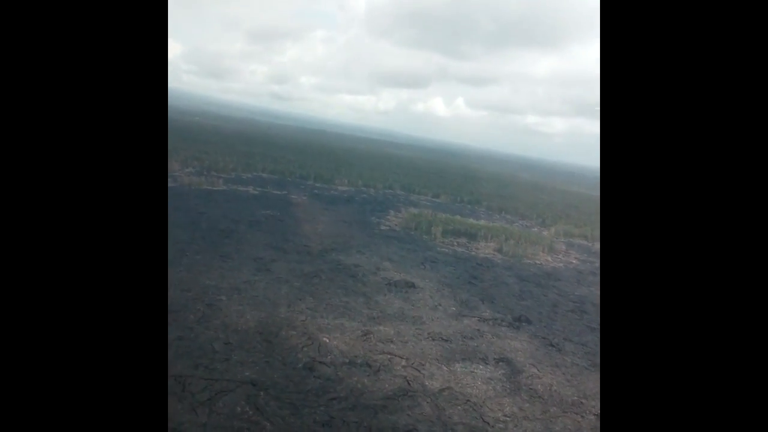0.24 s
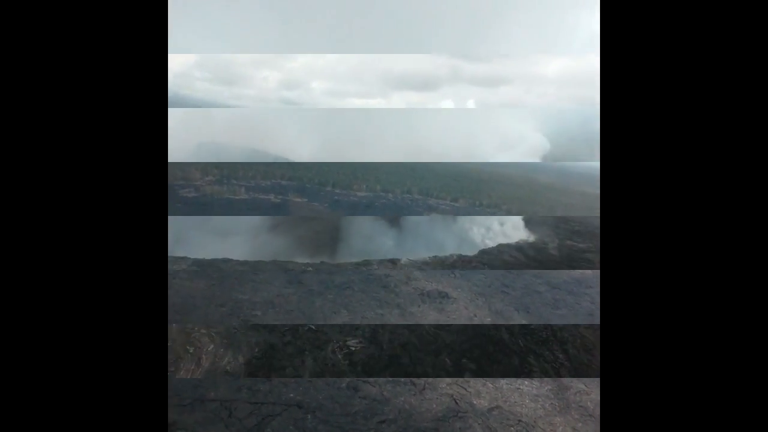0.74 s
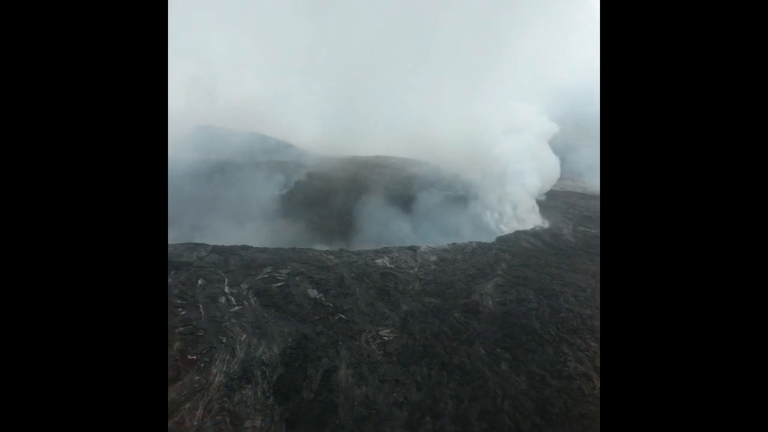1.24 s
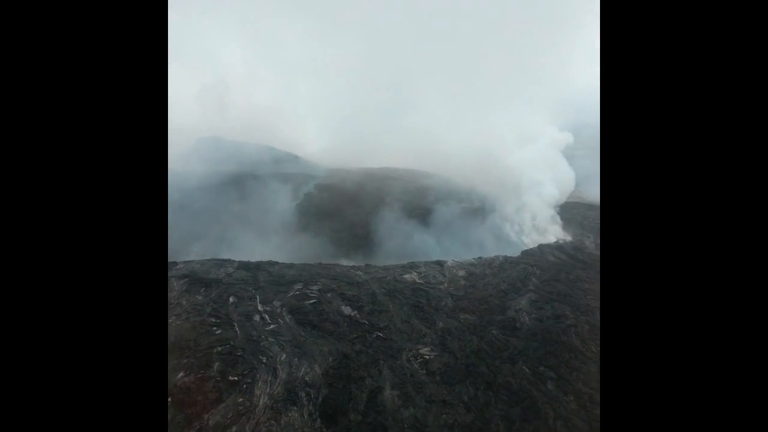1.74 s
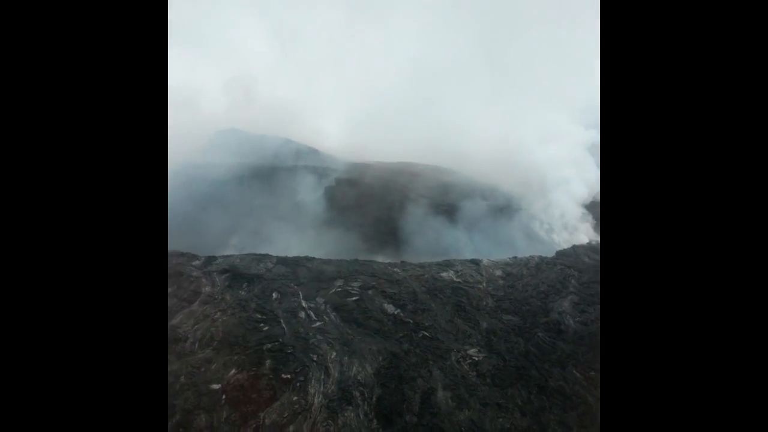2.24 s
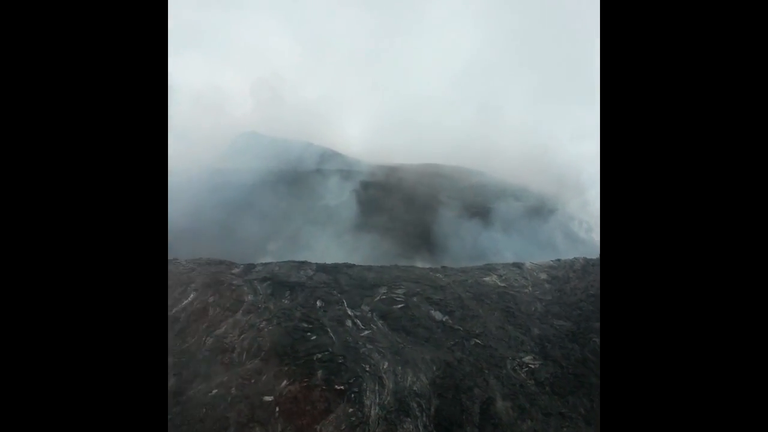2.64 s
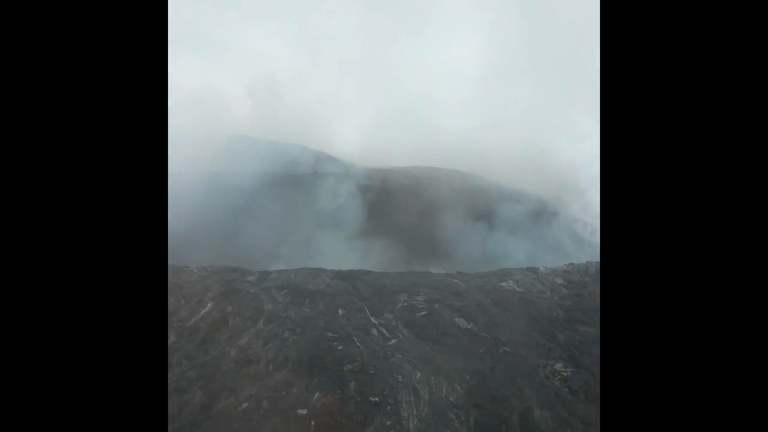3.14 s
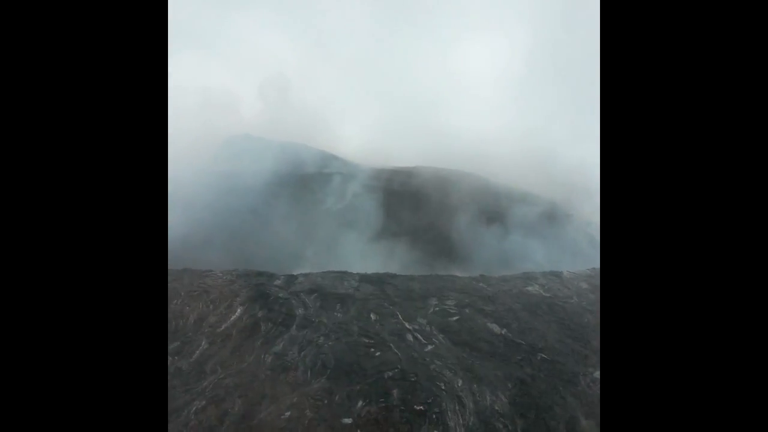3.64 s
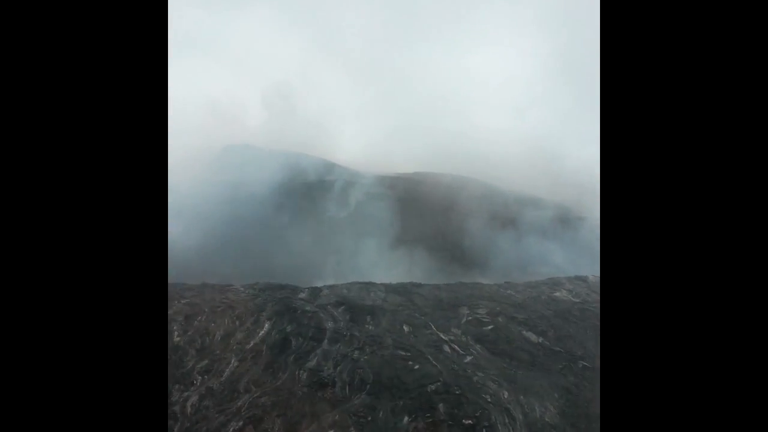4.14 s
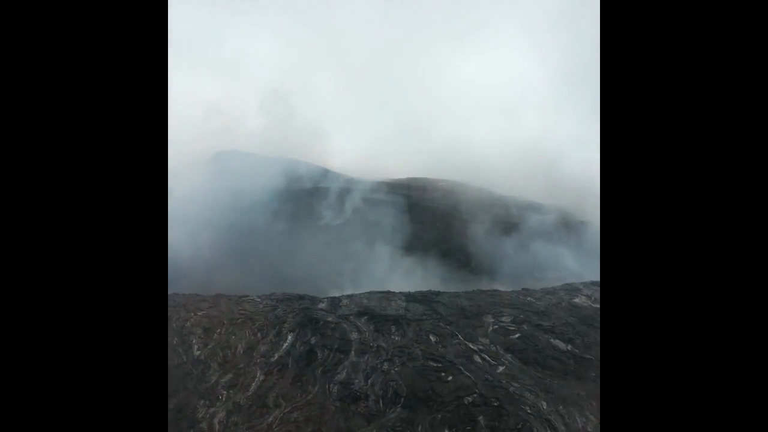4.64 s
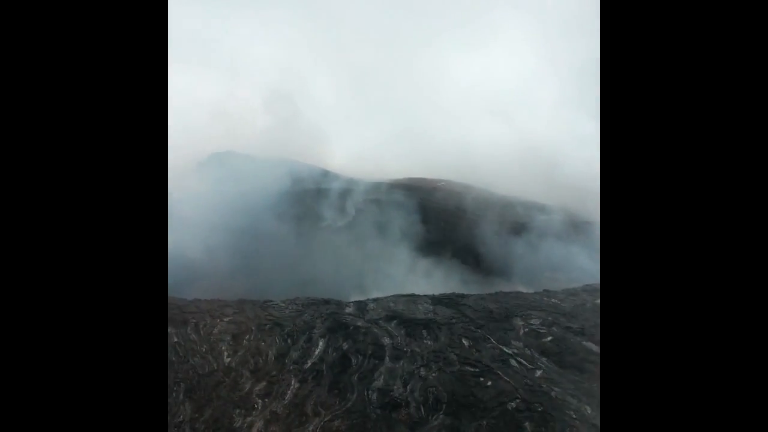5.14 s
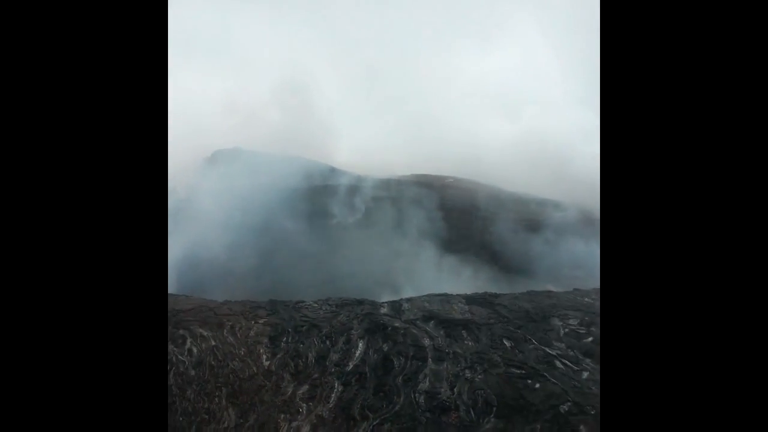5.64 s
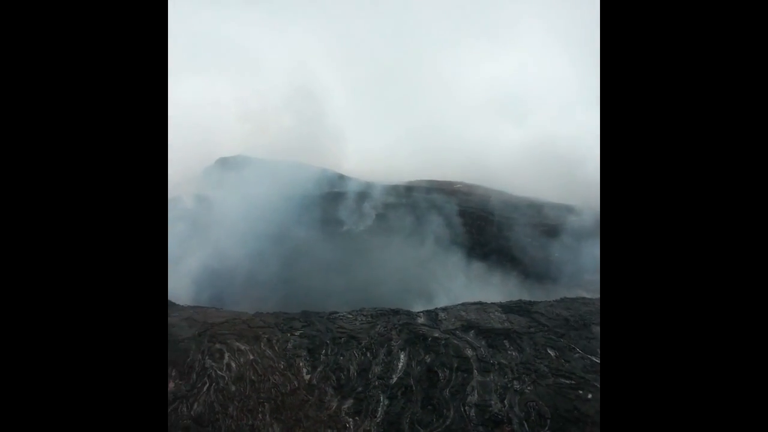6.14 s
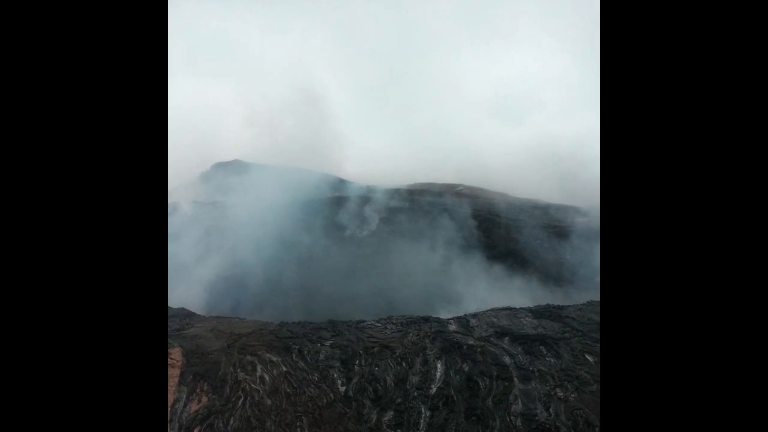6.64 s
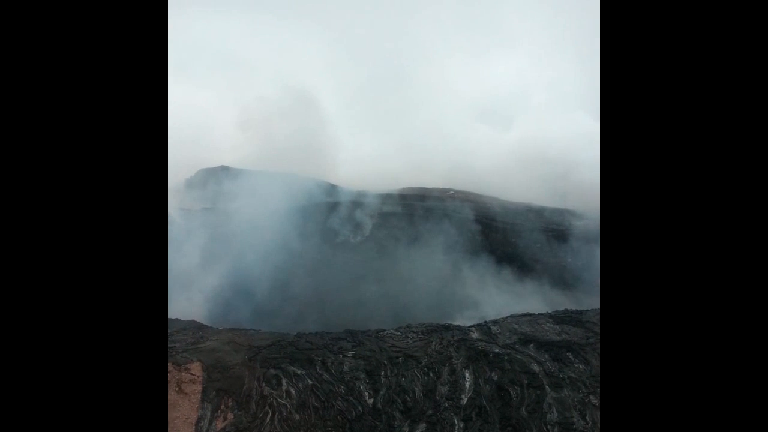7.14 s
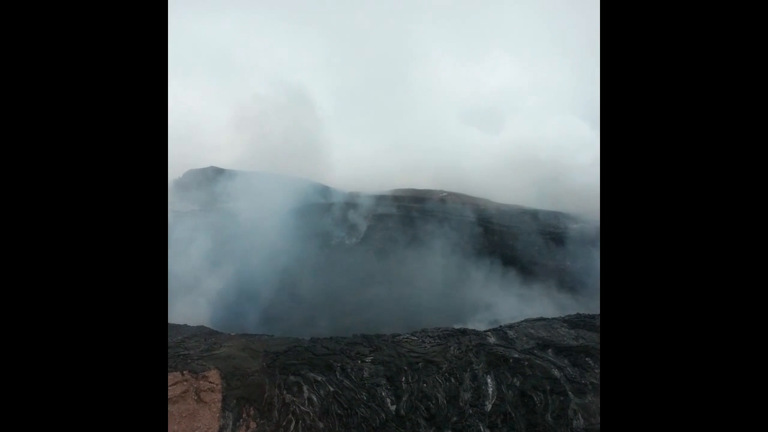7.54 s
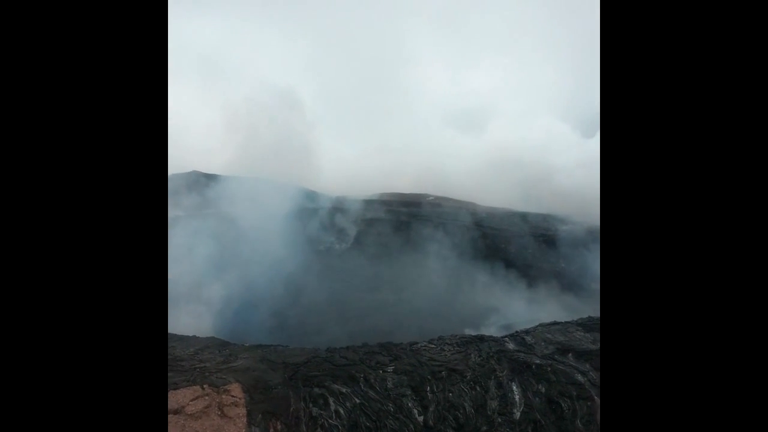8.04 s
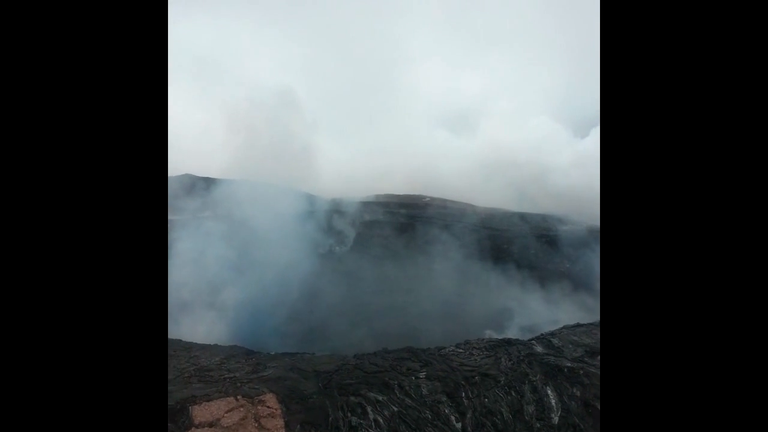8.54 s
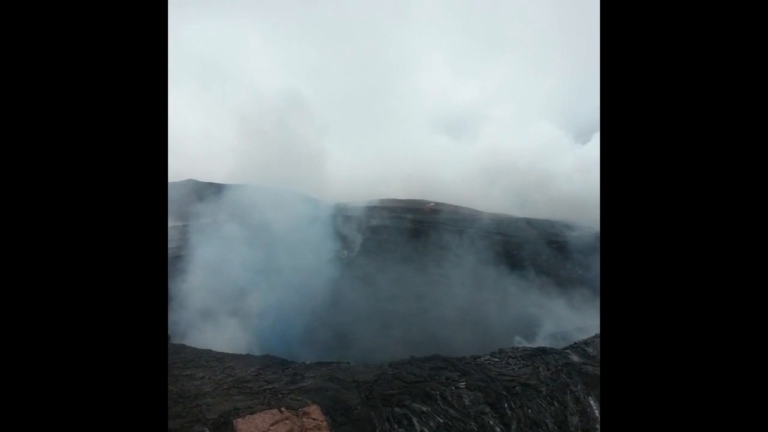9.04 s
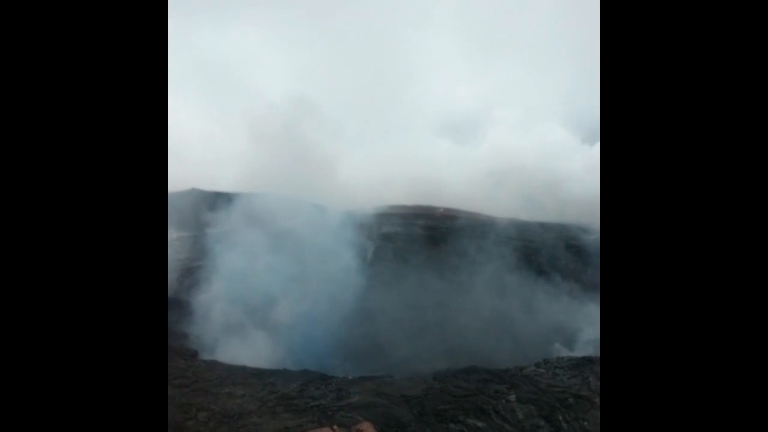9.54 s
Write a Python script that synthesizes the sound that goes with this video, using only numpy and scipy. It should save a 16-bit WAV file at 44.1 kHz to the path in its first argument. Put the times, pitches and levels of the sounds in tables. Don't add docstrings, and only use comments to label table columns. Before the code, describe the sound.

Continuous loud helicopter drone heard from the cabin: rumbling slipstream, hiss, constant piercing gearbox tone, faint very high turbine whine and irregular soft rotor slaps. It sinks briefly during the first second, switches abruptly, then holds nearly steady to the end, the breathy whistle sagging and weakening late. Mono, close, compressed-sounding, with gently saturated peaks and chirpy, patchy treble.

```python
import sys
import numpy as np
from scipy import signal
from scipy.fft import rfft, irfft, next_fast_len
from scipy.io import wavfile
from scipy.ndimage import uniform_filter1d, map_coordinates

SR = 44100
rng = np.random.default_rng(int(sys.argv[2]) if len(sys.argv) > 2 else 0)


def generate_wav(signal):
    frames = np.transpose(np.atleast_2d(signal))
    scaled = np.clip(frames, -1, 1) * 32767
    pcm = np.round(scaled).astype(np.int16)
    wavfile.write(sys.argv[1], SR, pcm)


def how_loud(loudness_db):
    steps = np.asarray(loudness_db, float) / 20
    return 10 ** steps


N = 432166
TIME = np.arange(N) / SR
CUT_S = 1.082
ROTOR_PER_MESH = 100 / 26425


def unit(x):
    return x / np.sqrt(np.mean(x ** 2) + 1e-20)


def by_leg(first, second):
    return np.where(TIME < CUT_S, first, second)


def leg_curve(tables):
    first, second = (np.interp(TIME, *np.transpose(table)) for table in tables)
    return by_leg(first, second)


def wobble(knots_per_s):
    knots = rng.standard_normal(int(N * knots_per_s / SR) + 4)
    return map_coordinates(knots, [TIME * knots_per_s])


def rush(spectrum, patchy_db):
    _, _, z = signal.stft(rng.standard_normal(N + 1024), SR, nperseg=512)
    patches = uniform_filter1d(rng.standard_normal(z.shape), size=6, axis=0)
    patches = uniform_filter1d(patches, size=10, axis=1)
    x = signal.istft(z * how_loud(patchy_db * unit(patches)), SR, nperseg=512)[1][:N]
    hz, density_db = np.transpose(spectrum)
    size = next_fast_len(N)
    grid_hz = np.fft.rfftfreq(size, 1 / SR) + 1
    gain = how_loud(np.interp(np.log(grid_hz), np.log(hz), density_db))
    return unit(irfft(rfft(x, size) * gain, size)[:N])


def narrow(centre_hz, width_hz, order, steady=0):
    slow_hz = np.fft.fftfreq(next_fast_len(N), 1 / SR)
    lowpass = 1 / (1 + (slow_hz / 50) ** (2 * order)) ** .5
    base = np.fft.ifft(np.fft.fft(rng.standard_normal(len(slow_hz))) * lowpass)[:N]
    at = np.cumsum(width_hz * np.ones(N) / 100) % (N - 1)
    base = np.interp(at, np.arange(N), base.real) + 1j * np.interp(at, np.arange(N), base.imag)
    base = base / (np.abs(base) + 1e-9) ** np.clip(steady, 0, 1)
    return unit(np.real(base * np.exp(2j * np.pi * np.cumsum(centre_hz) / SR)))


def throb(turns, depth, lag):
    return 1 + depth * np.cos(2 * np.pi * (turns - lag))


# time in seconds, gain in dB.
LEAN = [(1.09, 0), (2.15, 0.74), (2.55, -0.9), (2.9, 0), (4.4, -0.2), (6, 0.25), (6.7, -0.5), (7.1, -0.5),
        (7.5, 0.5), (8.2, 0), (8.7, 0), (9, 0), (9.4, 1), (9.8, 0.5)]


def fader_db():
    fade_s, fade_per_s = .42, 1.105
    swell_db, swell_s = -1, .27
    fade = 20 * np.log10(np.clip(1 - fade_per_s * np.clip(TIME - fade_s, 0, None), .05, 1))
    swell = swell_db * np.exp(-np.clip(TIME - CUT_S, 0, None) / swell_s)
    return by_leg(fade, swell + np.interp(TIME, *np.transpose(LEAN)))


def level(source):
    first_db, second_db, follows = source
    return by_leg(first_db, second_db) + follows * fader_db()


# frequency in Hz, density in dB per Hz.
CABIN_SPECTRUM = [(15, -56), (30, -28), (55, -29), (75, -12.5), (110, -9), (160, -1.5), (280, 1),
                  (400, -2.5), (500, -7.5), (620, -5), (780, -8), (1000, -11.5), (1500, -21), (3000, -46.5)]
# first leg in dB, second leg in dB, share of the fader followed (ratio).
ROAR_LEVEL = (-14, -15.5, 1)


def cabin_roar(blade):
    level_db = level(ROAR_LEVEL) + 2 + .27 * wobble(8)
    return how_loud(level_db) * throb(blade, .063, lag=.13) * rush(CABIN_SPECTRUM, patchy_db=.46)


# frequency in Hz, density in dB per Hz.
HISS_SPECTRUM = [(700, -23), (1300, 1.5), (1900, -0.5), (2300, -4), (3000, -6.5), (4600, -7), (5500, -11.5),
                 (6800, -16), (8200, -13.5), (9300, -11.5), (10800, -19.5), (12000, -22), (13500, -31),
                 (16000, -70)]
# first leg in dB, second leg in dB, share of the fader followed (ratio).
HISS_LEVEL = (-26.5, -27.5, 0.99)


def airflow_hiss(blade):
    level_db = level(HISS_LEVEL) + 1.5 + .8 * wobble(14)
    return how_loud(level_db) * throb(blade, .14, lag=.34) * rush(HISS_SPECTRUM, patchy_db=1.3)


# time in seconds, centre in Hz.
GAP_PITCH = [
    [(0, 818), (.5, 827), (.8, 816), (1.07, 808)],
    [(1.09, 691.3), (2, 699.9), (6, 703.2), (6.8, 692), (8.2, 682), (9.2, 664.4), (9.8, 665.7)],
]
# first leg in dB, second leg in dB, share of the fader followed (ratio).
WHISTLE_LEVEL = (-24.5, -15, 0.77)


def door_whistle(blade):
    lock_hz, widen_per_hz, weaken_db_per_hz = 690.2, 1.1, .1
    gust_db, gust_s = 2, .072
    dying_s, dying_db_per_s = 9.35, 15
    centre_hz = leg_curve(GAP_PITCH)
    slack_hz = np.clip(lock_hz - centre_hz, 0, None)
    width_hz = by_leg(20, 40) + widen_per_hz * slack_hz
    core = narrow(centre_hz, .9 * width_hz, order=3, steady=.46)
    skirt = how_loud(-9) * narrow(centre_hz - 60, 2.5 * width_hz, order=2)
    level_db = level(WHISTLE_LEVEL) - weaken_db_per_hz * slack_hz
    level_db += gust_db * np.exp(-np.abs(TIME - CUT_S) / gust_s) * (TIME > CUT_S)
    level_db -= dying_db_per_s * np.clip(TIME - dying_s, 0, .4)
    return how_loud(level_db) * throb(blade, .086, lag=.63) * (core + skirt)


# time in seconds, centre in Hz.
WHINE_PITCH = [
    [(0, 10300), (.45, 10310), (1.07, 10150)],
    [(1.09, 10110), (2.2, 10020), (3, 10030), (5.5, 9985), (7, 9924), (9.8, 10010)],
]
# first leg in dB, second leg in dB, share of the fader followed (ratio).
WHINE_LEVEL = (-31.5, -32, 1.1)


def compressor(rotor):
    swing = throb(3 * rotor, .16, lag=.75) * throb(rotor, .074, lag=.4)
    swing *= how_loud(1.3 * wobble(9) + .56 * wobble(1.3))
    whine = narrow(leg_curve(WHINE_PITCH), 240, order=1, steady=.2)
    return how_loud(level(WHINE_LEVEL) + 1.5) * swing * whine


# frequency in Hz, density in dB per Hz.
SLAP_SPECTRUM = [(900, -24.5), (1800, -1), (2500, -2.5), (4300, -2), (5500, -8), (7500, -11), (9000, -7.5),
                 (12000, -15), (15000, -45)]
# time in seconds, level in dB.
HARD_SLAPS = [(.151, -27), (.201, -22.5), (.412, -24.5), (.718, -28), (1.479, -21), (1.63, -24),
              (1.993, -27), (2.663, -26.5), (3.388, -27), (4.214, -23), (4.304, -24.5), (4.992, -25.5),
              (5.134, -28), (5.656, -30), (6.164, -24), (6.378, -23), (6.737, -27.5), (7.102, -26),
              (7.41, -26), (7.513, -25), (7.716, -24.5), (7.92, -24), (8.026, -22), (8.23, -26),
              (8.689, -21.5), (9.007, -26), (9.058, -21), (9.462, -23), (9.619, -26), (9.672, -23.5)]


def blade_slaps(blade):
    first_lag_turns, second_lag_turns, scatter_turns = .9, .52, .08
    soft_db, soft_spread_db, soft_top_db = -35.5, 5.5, -27.5
    rise_s, die_s = .005, .008
    passes = np.arange(int(blade[-1]))
    chance = rng.standard_normal((len(passes), 2))
    in_first = passes < np.interp(CUT_S, TIME, blade) - 1
    lag = np.where(in_first, first_lag_turns, second_lag_turns) + scatter_turns * chance[:, 0]
    when_s = np.interp(passes + lag, blade, TIME)
    size_db = np.minimum(soft_db + soft_spread_db * chance[:, 1], soft_top_db)
    size_db += np.interp(when_s, TIME, fader_db())
    puffs = np.zeros(N)
    for s, db in list(HARD_SLAPS) + list(zip(when_s, size_db)):
        near = slice(max(round((s - .04) * SR), 0), round((s + .04) * SR))
        age_s = TIME[near] - s + .001
        puff = how_loud(db + 2) * np.exp(-.5 * (age_s / np.where(age_s < 0, rise_s, die_s)) ** 2)
        puffs[near] = np.maximum(puffs[near], puff)
    return puffs * rush(SLAP_SPECTRUM, patchy_db=2)


def geared(turns, orders, levels, unsteady_db):
    late = np.clip((TIME - 2.5) / 6, 0, 1)
    out = np.zeros(N)
    for order, (first_db, early_db, late_db) in zip(orders, levels):
        level_db = by_leg(first_db, early_db + late * (late_db - early_db))
        level_db = level_db + unsteady_db * wobble(2.515)
        out += how_loud(level_db) * np.cos(2 * np.pi * order * turns)
    return out


def bevel_mesh(mesh, rotor):
    shake = .08 * wobble(40) + .2 * wobble(6)
    bevel = how_loud(.57 * wobble(25)) * np.cos(2 * np.pi * mesh + shake)
    for offset, side_db in zip(range(-3, 4), [-14.5, -29.5, -22, -66, -24.5, -28.5, -26]):
        side = np.cos(2 * np.pi * (mesh + offset * rotor + .27))
        bevel += how_loud(side_db + 1.5 * wobble(2)) * side
    return bevel


PLANET_ORDERS = [100, 199, 200, 300, 400, 500, 600, 695, 700, 800]
BLADE_ORDERS = [9, 12, 15, 18, 21, 24, 27]
PINION_ORDERS = [.596, 1, 1.192, 12, 16, 34]
# first leg in dB, early second leg in dB, late in dB.
PLANET_LEVELS = [(-19, -16.5, -12.5), (-37, -19, -18), (-18, -15.5, -11.5), (-21, -23.5, -44),
                 (-17.5, -27, -29), (-13.5, -27, -34), (-23, -41, -27.5), (-19.5, -48, -49),
                 (-27, -43, -38), (-25.5, -42, -41)]
BLADE_LEVELS = [(-25, -34.5, -36), (-15, -34, -22.5), (-20, -29.5, -15), (-23, -21.5, -17),
                (-12, -28.5, -22.5), (-13.5, -17, -12), (-16, -15.5, -14)]
PINION_LEVELS = [(-30, -45, -29), (-19, -17, -19), (-8, -29, -19), (-19.5, -34, -33), (-27, -27, -26),
                 (-34, -36, -29.5)]
# first leg in dB, second leg in dB, share of the fader followed (ratio).
BEVEL_LEVEL = (-19.5, -15.5, 0.86)
# time in seconds, gain in dB.
LOAD = [(1.09, 0), (2.2, 0.6), (2.5, -1), (3.7, 0), (5, 0.5), (6, 0), (6.6, -1.7), (7.6, -0.1),
        (8.35, -1.4), (8.7, 1), (8.95, -1), (9.8, -1)]


def gearbox(mesh_hz):
    mesh = np.cumsum(mesh_hz) / SR
    rotor = mesh * ROTOR_PER_MESH
    bevel = bevel_mesh(mesh, rotor)
    planet = geared(rotor + .0001 * wobble(8) - .37, PLANET_ORDERS, PLANET_LEVELS, unsteady_db=1.5)
    blades = geared(rotor, BLADE_ORDERS, BLADE_LEVELS, unsteady_db=2.5)
    pinion = geared(mesh / 17, PINION_ORDERS, PINION_LEVELS, unsteady_db=2.5)
    ring_hz = mesh_hz * ROTOR_PER_MESH * by_leg(101.5, 100.2)
    ring = how_loud(by_leg(-5, -9)) * narrow(ring_hz, 10, order=1, steady=.22)
    casing = how_loud(-18.5) * narrow(mesh_hz + 5, 100, order=1)
    level_db = level(BEVEL_LEVEL) + np.interp(TIME, *np.transpose(LOAD))
    return np.sqrt(2) * how_loud(level_db) * (bevel + casing + planet + blades + pinion + ring)


# time in seconds, mesh rate in Hz.
SPEED = [
    [(0, 1703.5), (1.07, 1702)],
    [(1.09, 1706.5), (1.75, 1707), (2.4, 1705), (4, 1706.5), (5.2, 1708), (6.3, 1710.5), (6.8, 1709),
     (7.6, 1710.3), (8.8, 1709.2), (9.8, 1710.3)],
]


def scene():
    mesh_hz = leg_curve(SPEED)
    rotor = np.cumsum(mesh_hz) / SR * ROTOR_PER_MESH
    blade = 3 * rotor
    air = cabin_roar(blade) + airflow_hiss(blade) + door_whistle(blade)
    machine = compressor(rotor) + blade_slaps(blade) + gearbox(mesh_hz)
    return (air + machine)[None]


# frequency in Hz, step in dB re the usual size there.
MUTE = [(2000, -28), (4000, -3), (5200, 2), (6200, 7), (8200, 8), (9000, 3), (10300, 2), (11000, 8),
        (12000, 13.5), (13000, 16), (14000, 20), (15000, 34)]


def starve_treble(x, size=1024):
    n, k = np.arange(2 * size) + .5, np.arange(size) + .5
    window = np.sqrt(2 / size) * np.sin(np.pi * n / (2 * size))
    basis = window * np.cos(np.pi / size * np.outer(k, n + size / 2))
    blocks = np.pad(x, (size, 2 * size - len(x) % size)).reshape(-1, size)
    coef = np.hstack([blocks[:-1], blocks[1:]]) @ basis.T
    count = len(coef)
    usual = np.sqrt(uniform_filter1d(np.mean(coef ** 2, axis=0), size=25))
    nearby = uniform_filter1d((coef / usual) ** 2, size=5, axis=0)
    nearby = uniform_filter1d(nearby, size=150, axis=1)
    loud = np.abs(nearby) ** .42 + 1e-6
    bands = np.repeat(rng.standard_normal((count, size // 16)), 16, axis=1)
    spare = rng.standard_normal((count, 1))
    drift = unit(uniform_filter1d(rng.standard_normal((count, 1)), size=8, axis=0)) * (k > size / 2)
    step_db = np.interp(k * SR / (2 * size), *np.transpose(MUTE))
    step_db = step_db + 1.6 * bands + 1.3 * spare + .8 * drift + 1.5 * bands * (k > .55 * size)
    step = usual * loud * how_loud(step_db)
    frames = np.round(coef / step) * step @ basis
    return (frames[:-1, size:] + frames[1:, :size]).ravel()[:len(x)]


def band_limit(x):
    return signal.sosfilt(signal.butter(12, 15800, fs=SR, output="sos"), x)


def record(dry):
    soft = dry / (1 + np.abs(dry / 1.06) ** 7) ** (1 / 7)
    mix = np.clip(starve_treble(soft[0]), -1, 1)[None]
    return band_limit(mix)


dry = scene()
out = record(dry)
generate_wav(out)
```